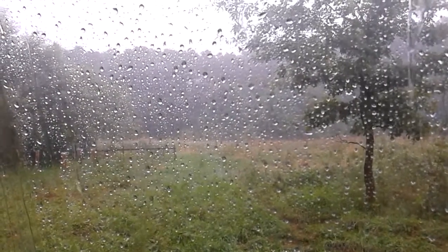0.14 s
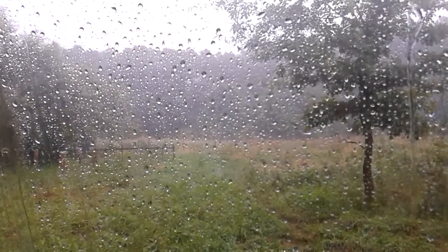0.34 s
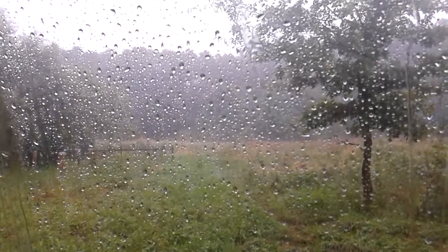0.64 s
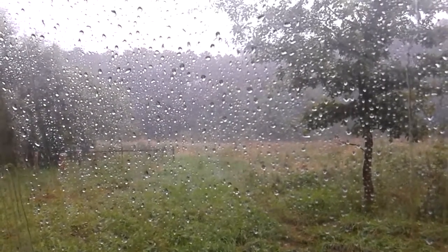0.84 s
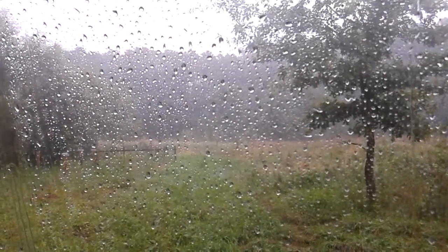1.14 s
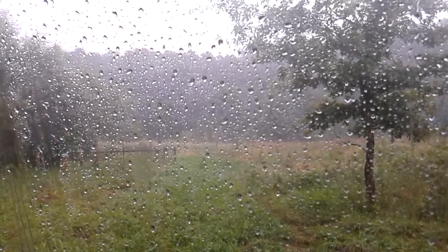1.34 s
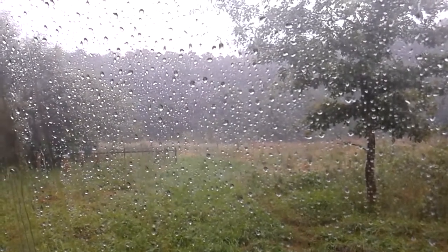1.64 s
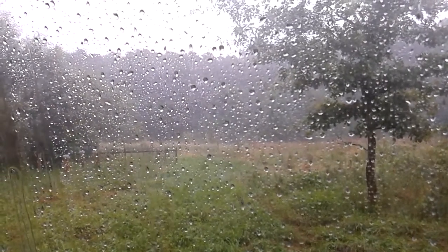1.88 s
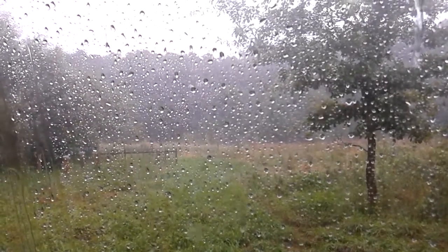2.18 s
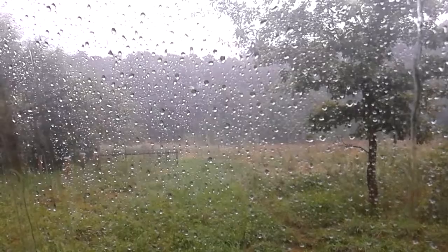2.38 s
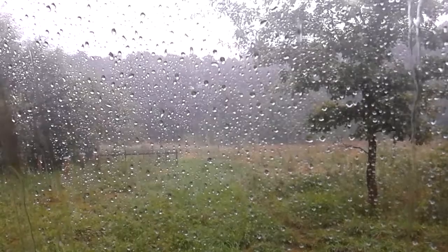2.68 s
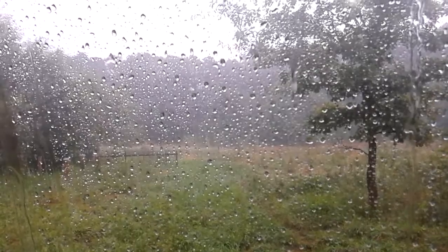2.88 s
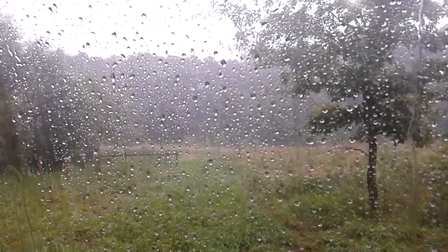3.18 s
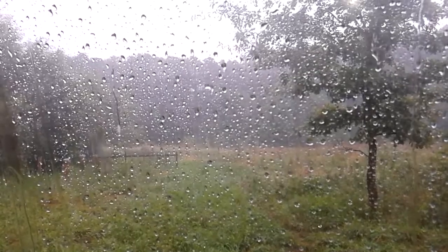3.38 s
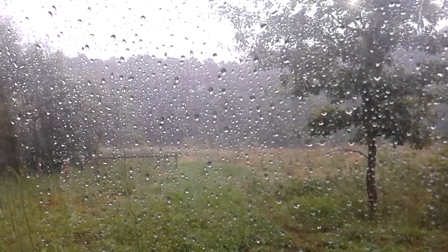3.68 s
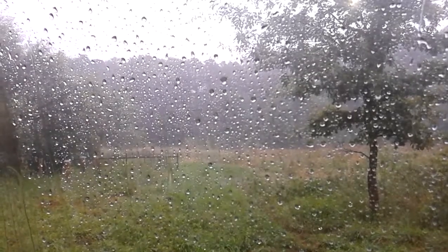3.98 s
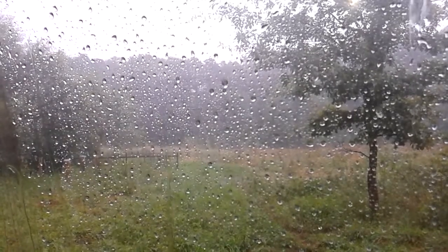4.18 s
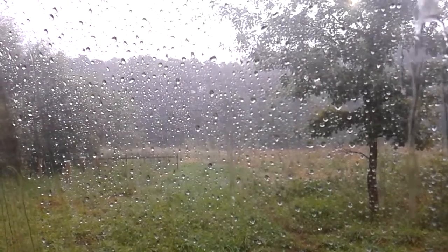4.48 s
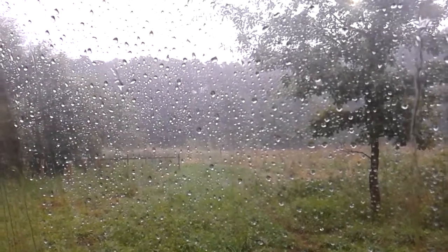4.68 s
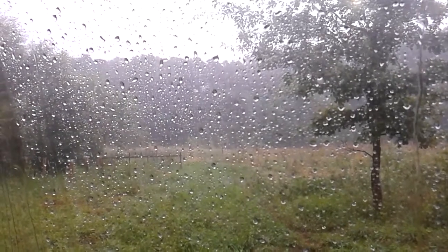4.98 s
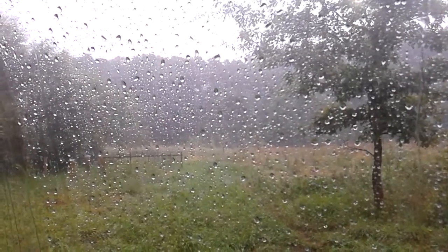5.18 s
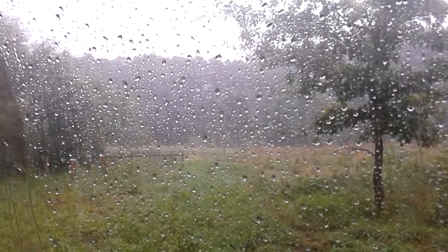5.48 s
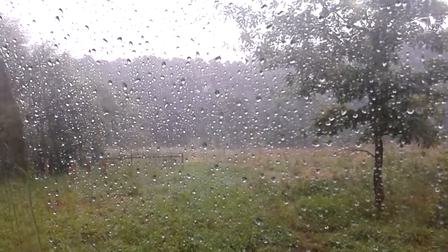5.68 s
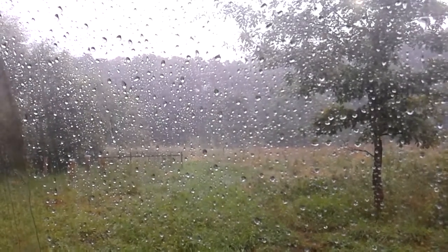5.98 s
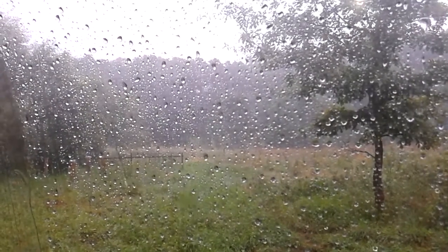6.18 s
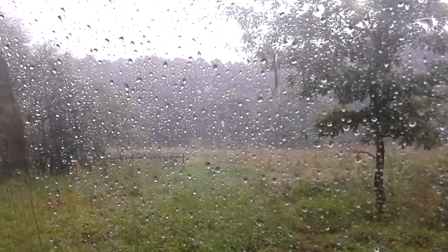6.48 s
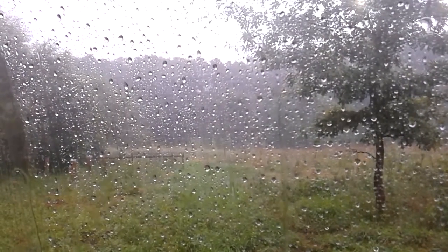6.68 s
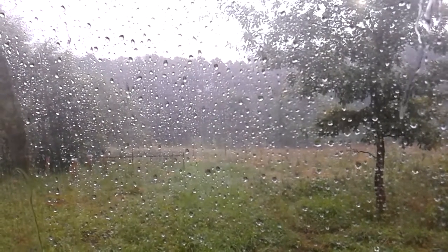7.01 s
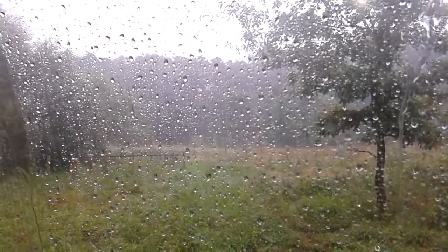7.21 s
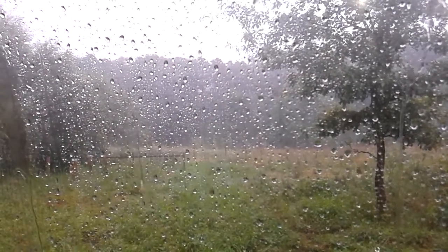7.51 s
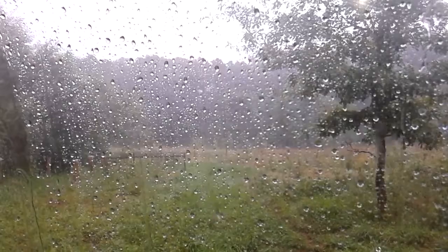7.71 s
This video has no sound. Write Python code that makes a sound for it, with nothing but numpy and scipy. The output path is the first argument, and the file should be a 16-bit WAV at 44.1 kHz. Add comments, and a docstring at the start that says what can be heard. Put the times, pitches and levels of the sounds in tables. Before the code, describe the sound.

Heavy rain drums on a parked vehicle for the whole eight seconds or so, heard from inside the cabin. The main sound is a dense, close patter of small drops on the roof, softened by the lining and coloured by the short ring of the panel, with little deep bass. It swells and eases only slightly.

Fat drops burst on the roof several times a second at uneven intervals, a little heavier in the first second and around 4 seconds. Short, hard knocks stand out among them, most clearly near 0.7, 5.9 and 7.6 seconds. Alongside, drops hit the windscreen with thin, bright splashes and tiny ticks, with one sharper splash just before 5 seconds. Far behind these impacts, the downpour outside makes a faint, even hiss through the glass. The rain is still falling steadily at the end.

```python
"""Heavy rain drumming on the roof of a parked vehicle, heard from the cabin.
Over a thousand small drops a second patter on the panel; fat drops burst into droplets and hard hits
knock on it, all coloured by its resonances and muffled by the lining. Other drops splash brightly
on the windscreen, and the downpour outside hisses faintly through the glass."""
import sys
import numpy as np
from scipy import signal
from scipy.fft import rfft, irfft
from scipy.io import wavfile
from scipy.ndimage import uniform_filter1d

SR = 44100
rng = np.random.default_rng(int(sys.argv[2]) if len(sys.argv) > 2 else 0)


def persist_wave(psi):
    """Save psi, clipped to +-1, as 16-bit WAV."""
    counts = np.round(np.clip(psi, -1, 1) * 32767).astype(np.int16)
    wavfile.write(sys.argv[1], SR, np.atleast_2d(counts).T)


N = 346185


def patter(per_s, spread_db, direct, spots):
    """Drops of uneven size land at random on a number of ringing spots; rms 1."""
    sizes = from_db(spread_db * np.minimum(rng.exponential(1, N), 4)) * rng.choice([-1, 1], N)
    drops = sizes * (rng.random(N) < per_s / SR)
    spot = rng.integers(0, spots, N)
    return rms_one(sum(signal.oaconvolve(drops * (spot == k), response)[:N]
                       for k, response in enumerate(spot_responses(spots, direct))))


def shower_db(s):
    """The shower swells and eases: its level at a time."""
    # strength of the shower: (time [s], level [dB])
    strength = [(0, -21.5), (0.45, -23), (1.05, -24), (1.45, -24.0), (1.8, -25), (2.3, -22.5), (2.9, -23.5),
                (3.3, -24.5), (3.55, -23), (4.35, -22.5), (4.78, -26), (5.1, -23), (5.77, -25.5),
                (6.3, -23.5), (6.7, -24), (7.3, -25.5), (7.6, -23), (7.85, -24)]
    return np.interp(s, *np.transpose(strength))


def fat_drops(droplets_per_s, spread_s, direct, treble_hz, low_cut_hz):
    """Big drops burst on the roof with little bass; lesser ones fall at random between them."""
    # the fattest drops: (time [s], level [dB], decay time [s], treble gain [dB])
    fattest = [(0.087,-7.5,0.025,-4), (0.116,-5.5,0.021,-6), (0.221,-10,0.0074,5), (0.265,-5.5,0.032,-3),
               (0.501,-6,0.04,3), (0.517,-5,0.024,-8), (0.57,-4,0.048,-6), (0.718,-5.5,0.036,0),
               (0.777,-14,0.0065,3), (0.872,-14,0.09,2), (0.941,-2,0.023,-9), (0.99,-9,0.041,-6),
               (1.03,-9.5,0.051,-1), (1.164,-8,0.075,-0.5), (1.242,-14,0.008,1), (1.398,-11,0.018,4),
               (1.535,-12,0.06,7), (1.682,-12,0.0081,5.5), (1.876,-6.5,0.037,-0.5), (2.007,-7,0.03,0),
               (2.08,-6.5,0.028,-8), (2.127,-8,0.077,-4), (2.372,-8,0.035,4.5), (2.457,-5.5,0.045,-4),
               (2.524,-10.5,0.018,3), (2.568,-11.5,0.021,3), (2.661,-9,0.045,3), (2.726,-9,0.087,1),
               (2.806,-7.5,0.06,-3), (2.858,-13,0.035,4), (2.994,-15,0.037,3), (3.139,-16,0.04,-6),
               (3.195,-15,0.055,-1), (3.369,-9,0.0073,-3), (3.417,-9.5,0.06,-3), (3.471,-12.5,0.069,-1),
               (3.568,-7,0.012,3), (3.627,-11.5,0.06,5.5), (3.656,-4,0.04,-3.5), (3.706,-5,0.019,0.5),
               (3.849,-4.5,0.06,-3), (3.88,-6.5,0.024,2.5), (3.952,-18,0.022,9), (4.008,-10,0.01,-3),
               (4.112,-4.5,0.063,-0.5), (4.193,-6.5,0.034,2), (4.346,-14,0.068,1), (4.441,-8,0.04,5),
               (4.569,-10.5,0.082,4), (4.884,-6,0.068,-0.5), (4.945,-10,0.06,5.5), (4.977,-12,0.038,-4),
               (5.091,-9.5,0.054,-4), (5.13,-7.5,0.033,6.5), (5.222,-8,0.06,1.5), (5.404,-14.5,0.06,4.5),
               (5.488,-3.5,0.04,-6), (5.593,-9,0.097,0), (5.668,-11.5,0.008,6), (5.706,-13.5,0.014,4),
               (5.847,-8.5,0.065,-2), (5.912,-8.5,0.05,-6), (6.11,-4,0.022,2), (6.172,-6,0.03,0),
               (6.21,-9.5,0.049,4.5), (6.251,-3,0.014,2), (6.312,-21,0.07,11), (6.435,-5,0.039,-0.5),
               (6.751,-4.5,0.048,0), (6.835,-14,0.008,7.5), (6.965,-9,0.035,-1), (7.028,-12,0.006,-10),
               (7.154,-10.5,0.032,3), (7.446,-8,0.0096,-4), (7.603,-10,0.014,7), (7.652,-14,0.067,3.5),
               (7.705,-18,0.008,10)]
    lesser_per_s, lesser_fade_s = 40, 0.0025
    chance = rng.uniform([0, -1, -1], [N / SR, 1, 1], size=(400, 3))[:int(lesser_per_s * N / SR)]
    # same columns; their level rides on the shower
    lesser = [(s, shower_db(s) + 3.5 + 2 * size, lesser_fade_s, 5.5 + 2 * bright)
              for s, size, bright in chance]
    out, lowpass = np.zeros(N), signal.butter(1, treble_hz, fs=SR)
    responses = spot_responses(count=36, direct=direct)
    for k, (s, db, fade_s, treble_db) in enumerate([*fattest, *lesser]):
        burst = splash(responses[k % len(responses)], fade_s, droplets_per_s, spread_s, first_hit=1.3)
        body = signal.lfilter(*lowpass, burst)
        add(out, s, from_db(db) * (body + from_db(treble_db) * (burst - body)))
    return signal.lfilter(*signal.butter(1, low_cut_hz, "high", fs=SR), out)


def hard_taps(direct, knock_s):
    """A drop that lands in one piece knocks the panel briefly, at the pitch of the spot it hits."""
    # hard hits on the roof: (time [s], level [dB], pitch [Hz])
    taps = [(0.282, -13, 1400), (0.527, -9.5, 1900), (0.687, -6.5, 1800), (0.717, -12, 1300),
            (1.180, -13, 1500), (1.869, -13, 1200), (1.889, -10, 1400), (1.970, -13.5, 1800),
            (2.137, -13.5, 1300), (2.400, -11.5, 1600), (2.527, -10, 1400), (3.370, -9.5, 1800),
            (3.725, -10.5, 2400), (4.016, -13, 1400), (4.197, -9, 1900), (4.327, -14, 1100),
            (4.364, -12, 1200), (4.450, -12, 2400), (4.885, -10.5, 1400), (4.993, -12, 1600),
            (5.098, -13, 1200), (5.140, -12, 1800), (5.603, -13, 900), (5.897, -6.5, 1500),
            (6.185, -12, 1100), (6.218, -8.5, 1200), (6.324, -13.5, 2000), (6.512, -14, 1700),
            (7.417, -14.5, 1400), (7.455, -13, 1200), (7.606, -7, 1700), (7.659, -12, 1500)]
    out, t = np.zeros(N), np.arange(SR // 100) / SR
    for (s, db, hz), response in zip(taps, spot_responses(len(taps), direct)):
        knock = np.sin(2 * np.pi * hz * t) * np.exp(-t / knock_s)
        add(out, s, from_db(db) * np.convolve(knock / np.abs(knock).max(), response))
    return out


def roof(blows):
    """The lining muffles every blow and the panel's resonances stand out."""
    # what roof and lining pass to the cabin: (frequency [Hz], relative gain [dB])
    lining = [(18, -42), (30, -28), (45, -24), (80, -30.5), (120, -14), (215, -11.5), (330, -5.5),
              (700, -0.9), (1050, -2), (2000, -4), (2900, -10), (3700, -11.5), (5200, -22), (7000, -32.5),
              (12000, -52.5)]
    # panel resonances and the notches between them: (frequency [Hz], width [Hz], gain [dB])
    panel_modes = [(256.7, 10.3, 4.5), (341, 27, 6), (398, 24, 2.5), (446, 22, -2), (463, 14, 3.5),
                   (564, 48, 3.5), (698, 35, 1), (754, 72, 3), (924, 36, 1), (1007, 39, -3.5),
                   (1080, 34, .5), (1247, 41, -1.5), (1285, 25, 2), (1555, 56, 4), (1624, 60, -2),
                   (1732, 42, 3), (1910, 80, 2), (2010, 34, -4), (2074, 69, 3.5), (2195, 35, 1.5),
                   (2320, 40, 0), (2525, 55, 2)]
    sound = coloured(blows, lining)
    for hz, width_hz, db in panel_modes:
        band = signal.lfilter(*signal.iirpeak(hz, hz / width_hz, fs=SR), sound)
        sound = sound + (from_db(db) - 1) * band
    return sound


def windscreen_drops(droplets_per_s, spread_s, direct, small_count, small_fade_s):
    """Drops shatter on the glass in short sprays; small random drops tick between them."""
    # the loudest splashes on the windscreen: (time [s], level [dB], decay time [s])
    loudest = [(0.085, -38, 0.03), (0.165, -41, 0.016), (0.235, -38.5, 0.02), (0.515, -45, 0.012),
               (0.561, -36, 0.035), (0.71, -36, 0.011), (0.752, -37.5, 0.007), (0.937, -33.5, 0.027),
               (1.027, -34.5, 0.02), (1.08, -38.0, 0.007), (1.17, -42, 0.02), (1.25, -39, 0.02),
               (1.531, -34.5, 0.012), (1.59, -38.0, 0.012), (1.68, -40.5, 0.007), (1.75, -39, 0.012),
               (1.89, -41, 0.017), (2.015, -33, 0.03), (2.073, -37, 0.033), (2.172, -39, 0.007),
               (2.231, -38, 0.0077), (2.291, -36.5, 0.025), (2.37, -43, 0.03), (2.457, -35.5, 0.03),
               (2.563, -34, 0.041), (2.655, -37.5, 0.022), (2.713, -38, 0.028), (2.797, -36.5, 0.016),
               (2.85, -37, 0.039), (2.95, -42, 0.015), (3.07, -42, 0.021), (3.28, -39, 0.012),
               (3.36, -35.5, 0.011), (3.465, -35.5, 0.03), (3.567, -34, 0.0061), (3.64, -37, 0.026),
               (3.85, -38.5, 0.02), (3.875, -37, 0.038), (3.95, -39, 0.02), (3.998, -39, 0.012),
               (4.113, -33.5, 0.028), (4.183, -34, 0.04), (4.344, -34, 0.01), (4.45, -38, 0.01),
               (4.558, -34.5, 0.018), (4.765, -45, 0.012), (4.88, -40, 0.03), (4.947, -23, 0.013),
               (5.09, -37, 0.034), (5.23, -40, 0.03), (5.452, -38, 0.0092), (5.658, -37, 0.02),
               (5.84, -42, 0.011), (5.966, -40, 0.0058), (6.099, -34, 0.018), (6.175, -34, 0.019),
               (6.215, -38, 0.007), (6.252, -34.5, 0.034), (6.435, -40, 0.03), (6.747, -37, 0.03),
               (6.83, -42, 0.007), (6.855, -34, 0.02), (6.965, -37.0, 0.012), (7.283, -38, 0.0058),
               (7.458, -36, 0.011), (7.538, -38, 0.011), (7.603, -36, 0.012)]
    weakest_db, strongest_db = -48, -42
    small = [(s, db, small_fade_s)
             for s, db in rng.uniform([0, weakest_db], [N / SR, strongest_db], (small_count, 2))]
    out, responses = np.zeros(N), spot_responses(count=12, direct=direct)
    for s, db, fade_s in [*loudest, *small]:
        spray = splash(rng.choice(responses), fade_s, droplets_per_s, spread_s, first_hit=0)
        add(out, s, from_db(db) * spray)
    return out


def glass(blows):
    """The windscreen gives every blow a thin, bright tone."""
    # colour of a splash on glass: (frequency [Hz], relative gain [dB])
    colour = [(300, -6), (1500, -15), (3800, 20.5), (6000, 7.5), (8500, 12.5), (11000, 5.5), (15500, -0.5)]
    return coloured(blows, colour)


def downpour():
    """The rain outside blurs into a steady hiss through the glass."""
    # colour of the hiss: (frequency [Hz], relative gain [dB])
    colour = [(100, -19), (1000, 23.5), (4000, 18.5), (6500, -5), (8300, 21.5), (10000, 13), (11500, -33)]
    return coloured(rng.standard_normal(N), colour)


def splash(response, fade_s, droplets_per_s, spread_s, first_hit, size=6144):
    """A drop spreads and breaks into droplets that land ever more weakly; the loudest 20 ms have rms 1."""
    t = np.arange(size) / SR
    droplets = rng.standard_normal(size) * (rng.random(size) < droplets_per_s / SR)
    droplets *= np.exp(-t / max(fade_s, .002)) * (1 - np.exp(-t / spread_s))
    droplets[0] = first_hit  # first contact, relative to the droplets that follow
    sound = signal.fftconvolve(droplets, response)
    power = uniform_filter1d(sound ** 2, size=SR // 50, mode="constant")
    return sound / np.sqrt(power.max())


def spot_responses(count, direct, size=6144):
    """Struck spots: a sharp tick of height `direct`, then dense reflections whose treble dies first."""
    # ring of panel and cabin: (frequency [Hz], time to fall 60 dB [s])
    ring = [(150, 0.17), (600, 0.089), (2000, 0.082), (6000, 0.073), (14000, 0.065)]
    t, hz = np.arange(size) / SR, np.fft.rfftfreq(size, 1 / SR)
    noise = rfft(rng.standard_normal((count, size)))
    edges_hz = [0, 300, 700, 1500, 3000, 6000, 11000, SR]
    tail = 0
    for low, high in zip(edges_hz, edges_hz[1:]):
        t60 = at_hz(ring, (low + high) / 2)
        band = irfft(noise * ((hz >= low) & (hz < high)))
        tail = tail + band * from_db(-60 * t / t60)
    tail /= np.linalg.norm(tail, axis=1, keepdims=True)
    tail[:, 0] += direct
    return tail / np.linalg.norm(tail, axis=1, keepdims=True)


def coloured(x, spectrum, size=8192):
    """Minimum-phase EQ that keeps the power of white noise."""
    gain = from_db(at_hz(spectrum, np.fft.rfftfreq(size, 1 / SR)))
    cepstrum = irfft(np.log(gain))
    cepstrum[1:size // 2] *= 2
    cepstrum[size // 2 + 1:] = 0
    response = irfft(np.exp(rfft(cepstrum)))
    return signal.fftconvolve(x, response / np.linalg.norm(response))[:N]


def from_db(db):
    """Decibels to gain."""
    return 10 ** (np.asarray(db) / 20)


def rms_one(x):
    """Scale to rms 1."""
    return x / np.sqrt(np.mean(x ** 2) + 1e-20)


def at_hz(points, hz):
    """Read a table on a log-frequency axis."""
    f, value = np.transpose(points)
    return np.interp(np.log(np.maximum(hz, 1)), np.log(f), value)


def add(out, s, sound):
    """Mix a sound in at a time."""
    at = max(round(s * SR), 0)
    out[at:at + len(sound)] += sound[:max(N - at, 0)]


def scene():
    """The shower drives the patter on roof and glass; big drops sit on top, the hiss far behind."""
    shower = from_db(shower_db(np.arange(N) / SR))
    on_roof = from_db(-2.5) * shower * patter(per_s=1550, spread_db=3.0, direct=0.5, spots=16)
    on_roof += from_db(-15) * fat_drops(droplets_per_s=3000, spread_s=0.0014, direct=0.59,
                                        treble_hz=2100, low_cut_hz=310)
    on_roof += from_db(-6.5) * hard_taps(direct=1.5, knock_s=0.0005)
    on_glass = from_db(-42.5) * shower * patter(per_s=800, spread_db=4.0, direct=0.2, spots=4)
    on_glass += from_db(-5) * windscreen_drops(droplets_per_s=4000, spread_s=0.007, direct=0.45,
                                               small_count=130, small_fade_s=0.005)
    return (roof(on_roof) + glass(on_glass) + from_db(-51) * downpour())[None]


def record(dry):
    """A steep low-pass cuts the top above 15.6 kHz."""
    return signal.sosfilt(signal.ellip(10, .1, 80, 15600, fs=SR, output="sos"), dry)


dry = scene()
out = record(dry)
persist_wave(out)
```